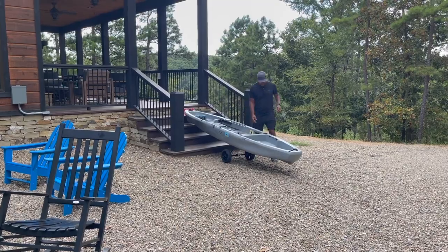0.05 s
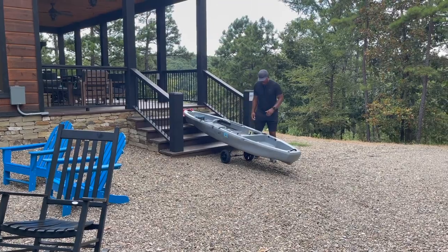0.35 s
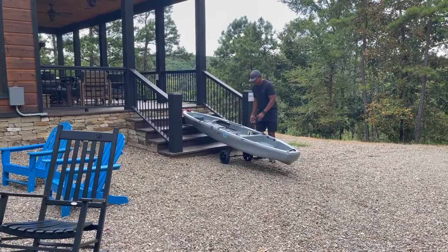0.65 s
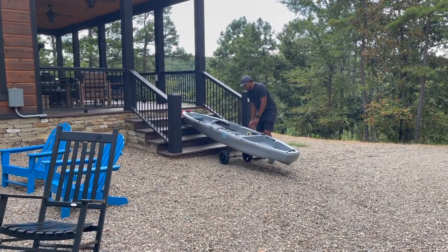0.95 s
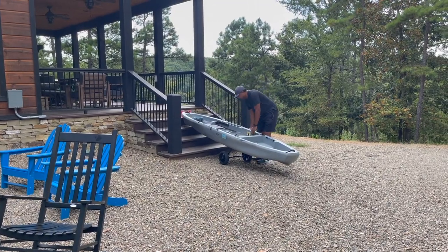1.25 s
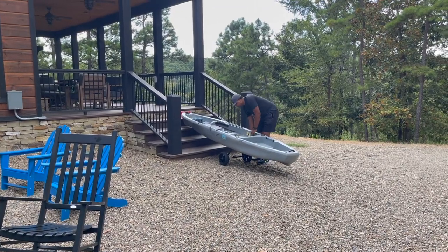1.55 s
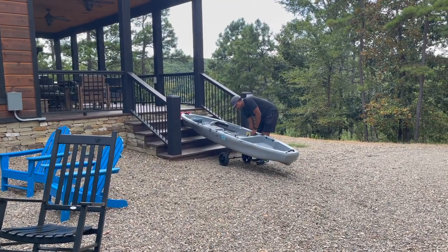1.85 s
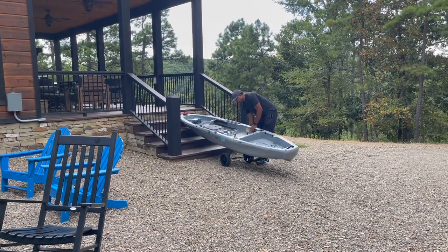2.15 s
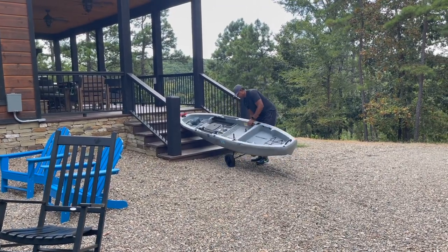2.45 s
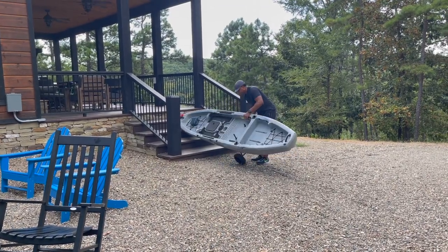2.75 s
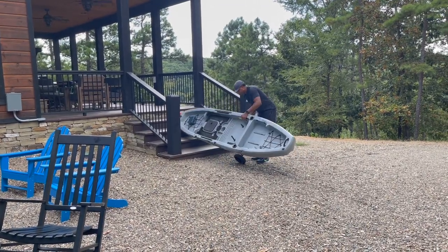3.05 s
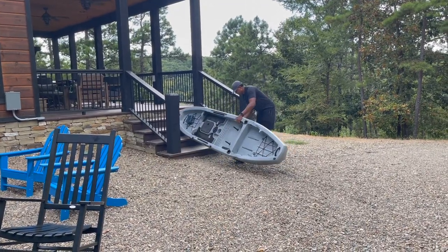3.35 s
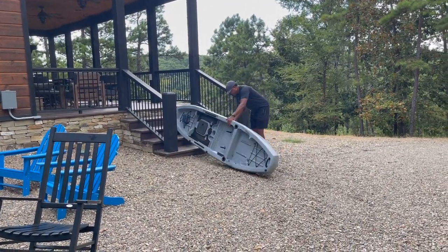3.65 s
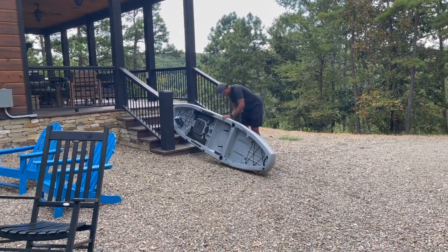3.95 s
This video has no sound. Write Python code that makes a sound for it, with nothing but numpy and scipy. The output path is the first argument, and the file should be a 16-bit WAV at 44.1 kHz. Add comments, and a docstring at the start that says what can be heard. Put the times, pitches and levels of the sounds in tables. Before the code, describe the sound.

A plastic kayak is handled and set down on gravel some metres away, over a low outdoor rumble. Feet crunch in the stones for the first 1.3 seconds. Light hull bumps follow, then gritty scraping from about 2.2 seconds and a run of hollow thuds around 2.8. At about 3.6 seconds the hull lands with the loudest cluster of knocks and a crunch, and the gravel settles.

```python
"""A plastic kayak is rolled off its cart and set down on a gravel yard, some metres away.
Feet shuffle in the stones, which crunch in many tiny impacts. The hull bumps on wooden steps and
scrapes by stick-slip friction, then drops on its side with a hollow knock as its modes ring, and
settles in the gravel. House and trees echo faintly over a low outdoor rumble and a distant insect."""
import sys
import numpy as np
from scipy import signal
from scipy.fft import rfft, irfft
from scipy.io import wavfile

SR = 44100
rng = np.random.default_rng(int(sys.argv[2]) if len(sys.argv) > 2 else 0)


def generate_wav(sig):
    """Save sig (samples, or channels by samples) to the path in sys.argv[1] as 16-bit PCM at SR."""
    pcm = np.round(np.clip(np.atleast_2d(sig).T, -1, 1) * 32767).astype(np.int16)
    wavfile.write(sys.argv[1], SR, pcm)


N = 176400
T = np.arange(N) / SR

# modes of the hollow hull: pitch_hz, relative_db, t60_s
HULL_MODES = [(128.3, -12, .3), (165, -3, .22), (189.92, 3, .3), (242.93, -5, .2), (280.3, -5.5, .16),
              (308.86, -2.5, .19), (357, -6, .2), (388, -11, .16), (470, -15, .14), (518, -5.5, .24),
              (603, -14, .14), (873.2, -9.5, 0.23), (1243.2, -14, .16), (1705, -19, 0.224),
              (1920, -18, 0.19)]


def amp(db):
    """Amplitude ratio of a level in decibels."""
    return 10 ** (np.asarray(db) / 20)


def unit(x):
    """Normalisation to an rms of 1."""
    return x / np.sqrt(np.mean(x ** 2))


def through(x, response):
    """Convolution of a sound with an impulse response."""
    return signal.oaconvolve(x, response)[:len(x)]


def colour(points, size=4096):
    """Minimum-phase response of unit energy with the given spectral shape."""
    hz, db = np.array(points).T
    bins_hz = np.arange(size // 2 + 1) * SR / size
    log_gain = np.log(amp(np.interp(np.log(bins_hz + 1), np.log(hz), db)))
    cepstrum = irfft(log_gain)
    cepstrum[1:size // 2] *= 2
    cepstrum[size // 2 + 1:] = 0
    response = irfft(np.exp(rfft(cepstrum)))
    return response / np.linalg.norm(response)


def burst(t60_s, size=24000):
    """Exponentially decaying noise."""
    return rng.standard_normal(size) * np.exp(-np.log(1000) * T[:size] / t60_s)


def ring(modes, size=24000):
    """Free vibration as a sum of damped modes, neighbours in opposite phase."""
    t = T[:size]
    return sum((-1) ** k * amp(db) * np.sin(2 * np.pi * hz * t) * np.exp(-np.log(1000) * t / t60_s)
               for k, (hz, db, t60_s) in enumerate(modes))


def ping(hz, t60_s, size=1024):
    """A single damped oscillator."""
    return ring([(min(hz, .45 * SR), 0, t60_s)], size=size)


def add(out, start_s, x):
    """Superposition of a sound at a given time."""
    i = max(int(start_s * SR), 0)
    out[i:i + len(x)] += x[:max(N - i, 0)]


def walk(rate_hz):
    """Random modulation: interpolated Gaussian values with a spread near 1."""
    return np.interp(T * rate_hz, np.arange(N), rng.standard_normal(N))


def grains(per_s, spread_db):
    """A Poisson train of tiny impacts, many weak and a few strong."""
    chance = rng.random(N) * SR / per_s
    hit = np.flatnonzero(chance < 1)
    out = np.zeros(N)
    out[hit] = amp(spread_db * np.minimum(-np.log(chance[hit]), 4.5)) * (-1.) ** hit
    return unit(out)


def clinks(low_hz, high_hz, cycles, per_s, spread_db):
    """Randomly struck resonators of equal Q: each decays 60 dB in the given number of cycles."""
    out = np.zeros(N)
    for when, pitch, strength in rng.random((int(per_s * N / SR), 3)):
        hz = low_hz * (high_hz / low_hz) ** pitch
        gain = amp(spread_db * min(-np.log(1 - strength), 4))
        add(out, when * N / SR, gain * hz * ping(hz, cycles / hz))
    return unit(out)


def envelope(events, level_column):
    """Incoherent events add in power; each rises, holds, then loses 20 dB every fade_s."""
    power = 0
    for row in events:
        start_s, rise_s, hold_s, fade_s = row[:4]
        attack = np.clip((T - start_s) / rise_s, 0, 1)
        decay = 10 ** (-np.maximum(T - start_s - rise_s - hold_s, 0) / fade_s)
        power = power + (attack * decay * amp(row[level_column])) ** 2
    return np.sqrt(power)


def gravel():
    """Granular impacts: clumps of clicks and clinks over duller grinding, with single ringing snaps."""
    # stones shifting under feet and hull: start_s, rise_s, hold_s, fade_s, bright_db, dull_db
    crunches = [(0.0, .027, .028, .125, -48, -47.5), (.518, .008, .022, .12, -50.5, -56.5),
                (.58, .025, .055, .07, -61, -53), (.762, .008, .02, .07, -66, -57),
                (.81, .015, .08, .157, -66, -60.5), (.918, .005, .043, .148, -46, -64),
                (.967, .019, .038, .143, -39, -58.5), (1.088, .008, .05, .15, -45.5, -60),
                (1.165, .0044, .03, .1, -41, -54), (1.21, .0175, .02, .055, -47, -50),
                (1.32, .03, .2, .3, -70, -68), (2.025, .01, .17, .1, -70, -64),
                (2.24, .061, .27, .04, -46.5, -54), (2.57, .087, .197, .2, -36.5, -51),
                (2.95, .019, .028, .2, -59, -56.5), (3.327, .016, .02, .06, -46, -49.5),
                (3.46, .03, .12, .103, -64, -62), (3.615, .0116, .02, .048, -26, -31),
                (3.68, .023, .06, .1, -44, -39), (3.938, .0116, .023, .78, -51, -56)]
    # stone striking stone, at relative levels: start_s, click_db, pitch_hz, ring_db
    snaps = [(.032, -38, 3100, -58), (.157, -38, 4200, -57), (.523, -45, 4100, -61), (.766, -46, 2200, -58),
             (.906, -52, 2450, -54), (.921, -39, 5200, -57), (.969, -30, 4100, -48),
             (1.054, -33.5, 2900, -52), (1.099, -33, 2650, -48), (1.135, -31.5, 4400, -54),
             (1.170, -31, 2450, -44), (1.294, -43.5, 4500, -63), (1.670, -50, 5000, -68),
             (2.075, -50, 2950, -46), (2.365, -31.5, 3300, -51), (2.667, -25, 7000, -45),
             (2.826, -29, 6500, -47), (3.125, -45.5, 5000, -63)]
    # spectra of the bright crunch and the dull grind: frequency_hz, relative_db
    crunch_spectrum = [(300, -36), (1200, -15.5), (2500, -6.5), (3400, -7), (4500, -5), (6000, -4),
                       (7200, -1), (9000, .5), (14000, .5)]
    grind_spectrum = [(80, -17), (280, -2), (600, 2), (850, -3), (1250, -16), (2200, -15), (3200, -21),
                      (4300, -17), (5500, -26), (12000, -44)]
    clumps = amp(1.7 * walk(rate_hz=110))
    clicks = unit(through(grains(per_s=3800, spread_db=3.2), burst(t60_s=.007, size=1024)))
    pebbles = amp(-2.5) * clinks(low_hz=1900, high_hz=12500, cycles=28, per_s=1600, spread_db=2.4)
    bright = amp(-7.5) * unit((clicks + pebbles) * clumps) * envelope(crunches, level_column=4)
    dull = unit(grains(per_s=2600, spread_db=2.2) * clumps) * envelope(crunches, level_column=5)
    rings = np.zeros(N)
    for start_s, click_db, pitch_hz, ring_db in snaps:
        add(bright, start_s, amp(click_db - 9) * burst(t60_s=.0162, size=2048))
        stone = ping(pitch_hz, t60_s=.035, size=2048) + .7 * ping(pitch_hz * 1.09, t60_s=.02, size=2048)
        add(rings, start_s, amp(ring_db - 5) * stone)
    return through(bright, colour(crunch_spectrum)) + through(dull, colour(grind_spectrum)) + rings


def air():
    """Ambient noise: an amplitude-modulated rumble, alike on both sides, under a faint steady hiss."""
    # outdoor background spectrum: frequency_hz, relative_db
    spectrum = [(20, -18), (30, -3.5), (55, 2.5), (120, -2), (250, -13), (550, -19.5), (1350, -33),
                (6200, -34), (9000, -39), (14000, -55)]
    mid = through(rng.standard_normal(N), colour(spectrum))
    low = signal.sosfilt(signal.butter(2, 300, fs=SR, output="sos"), mid)
    side_colour = colour([(30, 1), (500, 2), (1400, -12), (6000, -12.5), (12000, -32)])
    side = amp(-14.5) * through(rng.standard_normal(N), side_colour)
    waver = low * (amp(2 * walk(rate_hz=9.06)) - 1)
    return amp(-55.5) * (mid + waver + side * np.array([[1], [-1]]))


def insect():
    """Rapid clicks excite one narrow resonance, far off in the trees."""
    # the faint shrill: start_s, rise_s, hold_s, fade_s, level_db
    calls = [(1.25, .15, .36, .06, -74)]
    pitch_hz, bandwidth_hz = 6100, 900
    resonance = signal.iirpeak(pitch_hz, pitch_hz / bandwidth_hz, SR)
    shrill = signal.lfilter(*resonance, grains(per_s=1500, spread_db=1.2))
    return unit(shrill) * envelope(calls, level_column=4)


def knocks():
    """Impact excitation: the hull clacks, thuds, rings, then booms; longer contact gives less treble."""
    # blows on the hull, at relative levels: start_s, ring_db, clack_db, boom_db, contact_ms
    blows = [(1.410, -56, -52, -52, .14), (1.514, -48, -51, -56, .2), (1.725, -58, -67.5, -42, .45),
             (1.935, -47, -52, -52, .4), (2.027, -46, -48, -47, .25), (2.075, -54, -45, -54, .05),
             (2.099, -42, -39, -38, .21), (2.55, -38, -44, -29, .6), (2.763, -26, -14, -10, .32),
             (2.787, -33, -25, -26, .15), (2.856, -32, -21, -13, .46), (2.879, -26, -22.5, -23, .24),
             (2.912, -34, -27, -25, .35), (2.954, -33, -19.5, -20, .5), (2.981, -32, -23.5, -30, .3),
             (3.062, -46, -35, -40, .39), (3.498, -55, -42, -56, .25), (3.616, -30, -23.5, -42.5, .33),
             (3.625, -18, -20.5, -29, .132), (3.631, -19.5, -15, -27, .08), (3.644, -11, -21, -34, .12),
             (3.660, -13, -30, -36, .45), (3.712, -26, -36, -23, .6), (3.721, -16, -15.5, -21, .27),
             (3.769, -21, -28, -35, .3)]
    # deep flexing modes of hull and steps: pitch_hz, relative_db, t60_s
    flex_modes = [(62, -9.5, .25), (79, -5, .2), (101.17, -2, .2), (141, -3, 0.205)]
    # spectra of the contact, the hull's many close modes and the boom: frequency_hz, relative_db
    clack_spectrum = [(60, -26), (250, -6), (420, -4.5), (550, 0), (680, -1.5), (880, -.5), (1050, -4),
                      (1250, -3.5), (1600, -10), (3000, -15), (6000, -23), (14000, -40)]
    thud_spectrum = [(60, -28), (120, -6), (170, 0), (260, 0), (340, -3), (450, -15), (700, -26),
                     (3000, -60)]
    boom_spectrum = [(20, -32), (45, -10), (65, -1), (100, -1), (150, -2), (220, -13), (380, -20),
                     (600, -34), (3000, -72)]
    boom_lag_s = .014
    pushes, clacks, thuds, flexes, booms = np.zeros((5, N))
    for start_s, ring_db, clack_db, boom_db, contact_ms in blows:
        push = np.exp(-T[:512] * 1000 / contact_ms)
        push = push / push.sum()  # force pulse of unit sum
        add(pushes, start_s, amp(ring_db) * push)
        add(thuds, start_s, amp(ring_db - 11.5) * burst(t60_s=.17))
        add(clacks, start_s, amp(clack_db - 3.5) * through(burst(t60_s=.075), push))
        add(flexes, start_s + boom_lag_s, amp(boom_db) * push)
        add(booms, start_s + boom_lag_s, amp(boom_db - 11.5) * burst(t60_s=.22))
    return (amp(-10) * through(pushes, ring(HULL_MODES))
            + through(thuds, colour(thud_spectrum))
            + through(clacks, colour(clack_spectrum))
            + amp(-9) * through(flexes, ring(flex_modes))
            + through(booms, colour(boom_spectrum)))


def scraping():
    """Stick-slip friction: plastic rasps and chirps over grit, and the slips set the shell droning."""
    # the hull sliding: start_s, rise_s, hold_s, fade_s, rasp_db, drone_db
    slides = [(1.93, .04, .25, .2, -66.5, -49), (2.24, .008, .103, .01, -55, -48),
              (2.315, .02, .095, .12, -48, -33), (2.49, .012, .1, .12, -50, -37.5),
              (2.60, .02, .022, .1, -55, -30), (2.76, .024, .194, .23, -60, -32.5),
              (3.322, .02, .04, .15, -59, -33), (3.618, .012, .022, .05, -33.5, -30),
              (3.675, .02, .09, .09, -45.5, -35)]
    # spectra of the contact and the shell: frequency_hz, relative_db
    rasp_spectrum = [(200, -19.5), (600, 1), (1200, 2), (2300, -1), (3600, -6), (5000, -14), (8000, -22.5),
                     (14000, -38.5)]
    drone_spectrum = [(25, -28), (50, -7), (80, 0), (130, 0), (200, -3), (330, -9), (500, -20), (1000, -35),
                      (4000, -68)]
    judder = amp(2 * walk(rate_hz=55))
    rasp = amp(-3.5) * through(grains(per_s=3600, spread_db=2.4), colour(rasp_spectrum))
    chirps = amp(-4) * clinks(low_hz=1050, high_hz=2800, cycles=20, per_s=1100, spread_db=2)
    contact = (rasp + chirps) * unit(judder) * envelope(slides, level_column=4)
    slips = unit(grains(per_s=520, spread_db=1.8) * judder) * envelope(slides, level_column=5)
    shell = colour(drone_spectrum)
    hollow = through(ring(HULL_MODES), shell)
    return contact + through(slips, shell) + amp(-14) * through(slips, hollow / np.linalg.norm(hollow))


def catches():
    """Stick-slip in short bursts: an uneven run of slips whose pitch sags as the plastic lets go."""
    # gritty catches of the sliding hull: start_s, length_s, pitch_hz, level_db
    snags = [(2.244, .022, 2350, -56), (2.300, .018, 2250, -53), (2.362, .032, 2200, -51),
             (2.398, .022, 1900, -47), (2.424, .022, 2700, -51), (2.498, .022, 2200, -47.5),
             (2.567, .018, 2150, -48.5)]
    slips_per_s = 1200
    glide, scatter = -.12, .15  # natural log of the pitch ratio
    out = np.zeros(N)
    for start_s, length_s, pitch_hz, level_db in snags:
        run = np.zeros(N)
        slips = max(int(length_s * slips_per_s), 2)
        progress = (np.arange(slips) + rng.random(slips)) / slips
        for along, detune in zip(progress, rng.standard_normal(slips)):
            slip_hz = pitch_hz * np.exp(glide * (along - .5) + scatter * detune)
            add(run, start_s + along * length_s, np.sin(np.pi * along) ** .5 * ping(slip_hz, t60_s=.006))
        out += amp(level_db) * run * np.sqrt(length_s * SR / np.sum(run ** 2))
    return out


def echoes(x):
    """Diffuse reflection: quick scatter from ground and house, and a faint dull reverberant tail."""
    wall_colour = colour([(60, -21.5), (200, -9.5), (500, .5), (2500, 1), (6000, -3), (12000, -3)])
    tail_colour = colour([(30, -12.5), (150, -3.5), (1000, -.5), (4000, -5), (12000, -13.5)])
    walls = through(burst(t60_s=.0885), wall_colour)
    tail = through(burst(t60_s=.665), tail_colour)
    return through(x, amp(-15) * walls / np.linalg.norm(walls) + amp(-23) * tail / np.linalg.norm(tail))


def yard(x):
    """Decorrelated reflections widen the direct sound; the bass stays alike on both sides."""
    side = amp(1) * signal.sosfilt(signal.butter(1, 260, "high", fs=SR, output="sos"), echoes(x))
    return x + echoes(x) + side * np.array([[1], [-1]])


def scene():
    """A level difference puts kayak and feet a touch left of centre in the open yard."""
    near = knocks() + gravel() + scraping() + catches()
    return amp([[.2], [-.4]]) * yard(near) + air() + insect()


def record(dry):
    """Port resonance: the microphone peaks and falls out of phase in the treble, and its treble ends at a cut-
    off; a high-pass also removes the deepest bass."""
    # microphone response: frequency_hz, gain_db
    response = [(20, 0), (7000, 0), (8500, 1), (9600, 3.5), (10300, 7), (10800, 13.5), (11400, 13.5),
                (12300, 6), (13050, -2), (13350, -24), (16000, -27)]
    # phase between its two ports: frequency_hz, lag_half_turns
    port_phase = [(0, 0), (8800, 0), (10200, 1), (11800, 2), (22050, 2)]
    low_cut_hz, high_cut_hz = 37.6, 15300
    size = 2 * N
    hz = np.arange(N + 1) * SR / size
    left, right = rfft(dry, size) * amp(np.interp(hz, *np.array(response).T))
    lag = np.exp(1j * np.pi * np.interp(hz, *np.array(port_phase).T))
    heard = irfft(np.array([left / lag, right]))[:, :N]
    heard = signal.sosfilt(signal.butter(2, low_cut_hz, "high", fs=SR, output="sos"), heard)
    return signal.sosfilt(signal.ellip(8, .2, 70, high_cut_hz, fs=SR, output="sos"), heard)


dry = scene()
out = record(dry)
generate_wav(out)
```